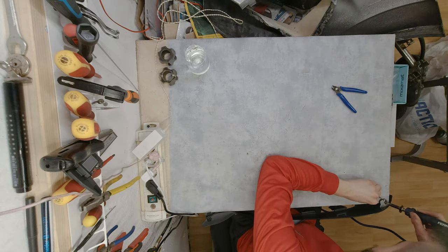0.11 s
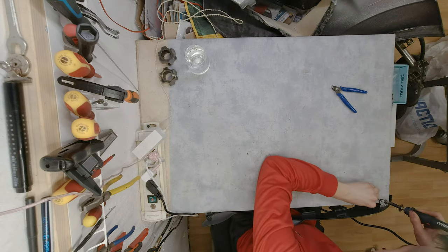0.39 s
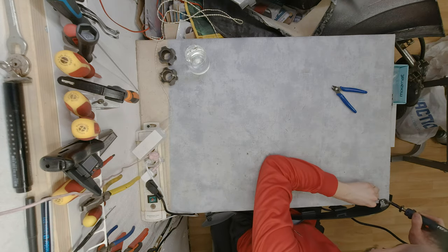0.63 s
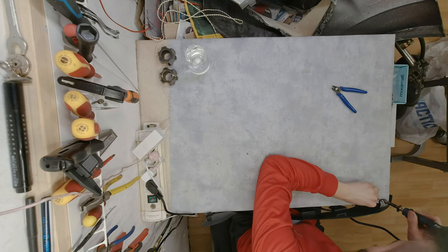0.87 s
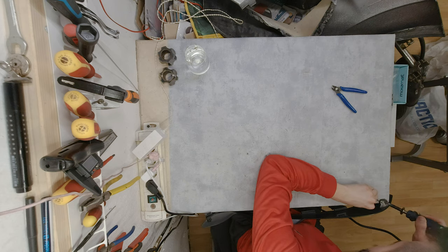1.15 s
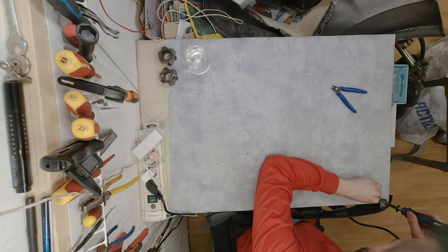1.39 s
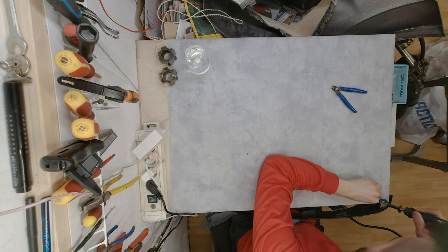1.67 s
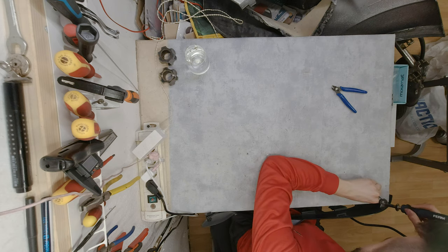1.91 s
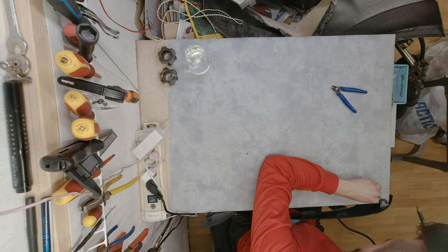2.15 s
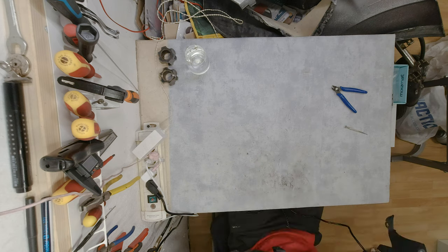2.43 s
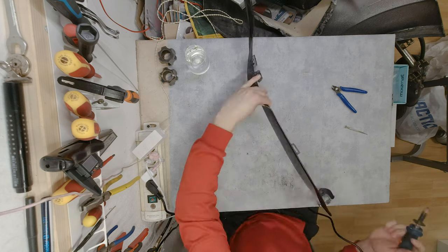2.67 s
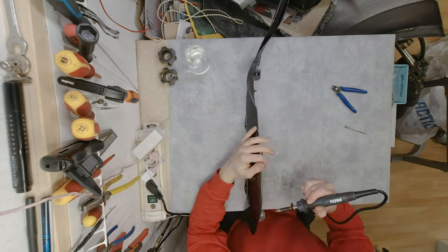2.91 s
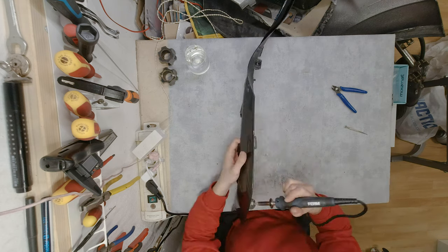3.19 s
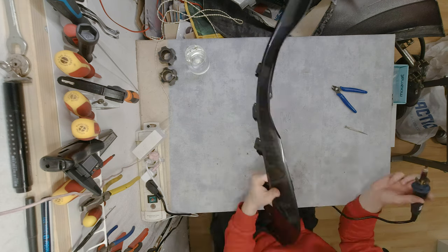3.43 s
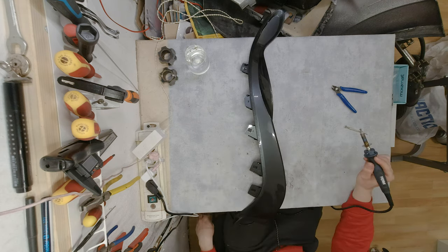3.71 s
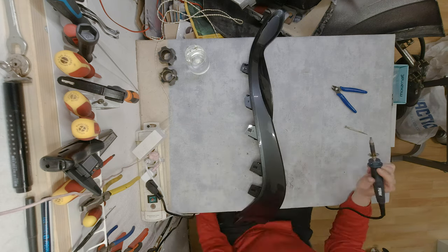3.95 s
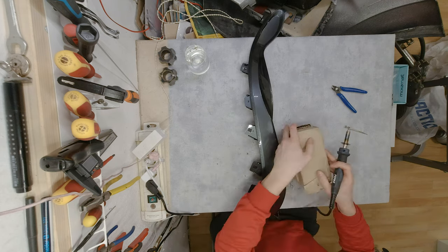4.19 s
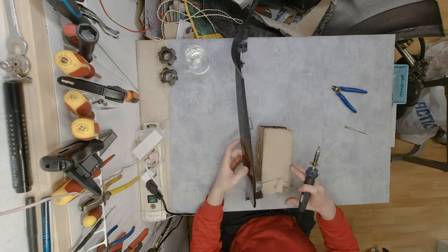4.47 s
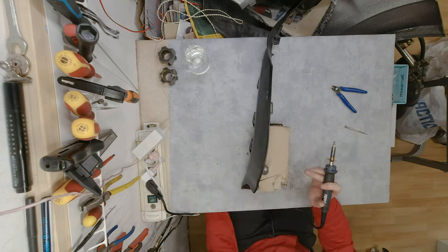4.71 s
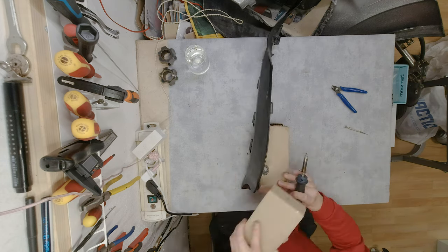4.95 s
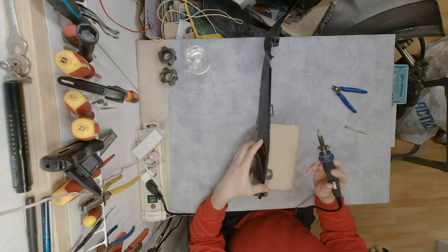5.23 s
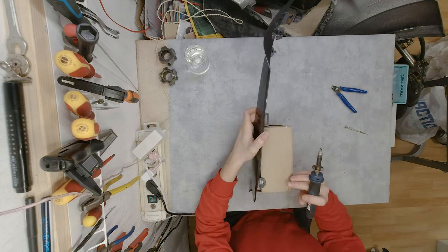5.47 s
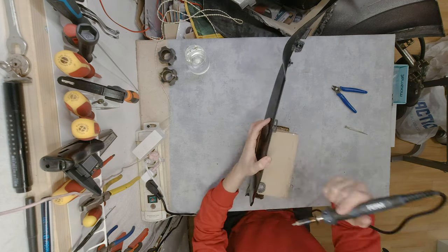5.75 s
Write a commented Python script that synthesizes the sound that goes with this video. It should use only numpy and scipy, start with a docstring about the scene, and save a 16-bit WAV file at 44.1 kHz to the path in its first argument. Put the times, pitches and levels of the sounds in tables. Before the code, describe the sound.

Quiet dull taps and faint grazes at a workbench, then a busy run of soft plastic knocks, scuffs and clicks ending in a firm thump.

```python
"""A long plastic trim piece, cardboard blocks and a hand tool are handled on a padded workbench.
Over quiet room tone, hand rustle and bench rumble (filtered noise), a tool tip grazes the trim (short noise
strokes), pokes it (choked bench modes) and a few clips click (detuned decaying sines). Just before 2 s the first
heavier knock rings the bench; from 2.3 s knocks and scuffs crowd in, with clicks between, and the rustle swells
several times before one last strong knock. The room is dry, heard by two spaced microphones."""
import sys
import numpy as np
from scipy import signal
from scipy.fft import rfft, irfft
from scipy.io import wavfile
from scipy.ndimage import uniform_filter1d

SR = 44100
rng = np.random.default_rng(int(sys.argv[2]) if len(sys.argv) > 2 else 0)


def volts_from_decibels(level):
    """Turn decibel levels (scalar or array-like) into linear amplitude factors."""
    exponent = np.asarray(level, float) / 20
    return 10 ** exponent


def digitize_waveform(pressure):
    """Quantize a signal to 16-bit integers and store it at the path in sys.argv[1].

    Rows of a 2-D input are taken as channels; values are limited to [-1, 1].
    """
    field = np.atleast_2d(pressure).T
    bounded = np.clip(field, -1, 1)
    quanta = np.round(bounded * 32767).astype(np.int16)
    wavfile.write(sys.argv[1], SR, quanta)


N = 258405

# Event levels are those ahead of the room.
# how busy the hands are: (time [s], rustle level [dB])
HAND_ACTIVITY = [(0.0, -73.5), (2.33, -77), (3.02, -64), (3.16, -76), (4.31, -69), (4.58, -61.5),
                 (4.72, -81.5), (4.91, -72), (5.29, -64), (5.55, -61), (5.86, -78)]
# colour of plastic scraping, before any tilt: (frequency [Hz], relative level per hertz [dB])
SCRAPE_COLOUR = [(500, 4.5), (1100, 1.5), (2500, 3.5), (3900, 3.5), (6500, -7), (10500, -12), (12800, -19),
                 (16000, -15.5)]
# colour of the steady room tone: (frequency [Hz], relative level per hertz [dB])
ROOM_TONE_COLOUR = [(30, 4.5), (200, 8.5), (450, -17), (1000, -7.5), (3500, -18.5), (9000, -38.5)]
# the tool tip grazes the trim: (time of fullest level [s], hiss rms there [dB])
TOOL_GRAZES = [(0.1235, -51), (0.5542, -53.5), (0.7223, -53), (1.2678, -54), (1.286, -60), (1.6445, -52.5),
               (1.8124, -57), (2.2654, -48.5), (3.249, -56)]
# the tool tip pokes the trim held against the bench edge: (time [s], mean peak of both sides [dB])
TOOL_POKES = [(0.1399, -32.5), (0.399, -34), (0.5759, -30.5), (0.799, -42.5), (0.92, -35.5), (0.965, -37.5),
              (1.0998, -31.5), (1.323, -31), (2.077, -35), (2.094, -37)]
# modes of bench and parts: (centre frequency [Hz], decay time t60 before the choke [s])
BENCH_MODES = [(80, 0.5), (140, 0.082), (212, 0.052), (315, 0.03), (510, 0.021), (730, 0.019),
               (1010, 0.028), (1400, 0.003)]
# clips and corners of the trim click: (time [s], peak [dB], pitch centre [Hz])
CLIP_CLICKS = [(0.4596, -60, 4940), (0.4942, -55, 1750), (2.956, -43.5, 2110), (3.6145, -44.5, 1930),
               (4.656, -35, 5020), (5.238, -42, 1863), (5.4327, -30, 3850), (5.4578, -34.5, 1145),
               (5.4873, -34.5, 2013)]
# trim and blocks knock on the bench: (time [s], mean peak of both sides [dB], pitch centre [Hz])
BENCH_KNOCKS = [(1.838, -29.5, 274), (2.3714, -40.5, 330), (2.4949, -26.5, 292), (2.6023, -29, 300),
                (2.633, -31, 205), (2.656, -31, 201), (2.6851, -28.5, 234), (2.7905, -26, 254),
                (2.8091, -23.5, 180), (2.852, -24.5, 150.8), (2.865, -22.5, 430), (2.9416, -38, 383),
                (3.126, -40.5, 128.3), (3.578, -26.5, 537), (3.615, -23, 188), (3.635, -33.5, 115.4),
                (3.655, -33, 615), (3.6588, -28, 145), (3.688, -35, 377), (3.978, -39.5, 305.4),
                (4.0386, -38.5, 157), (4.1141, -40, 344), (4.2561, -25.5, 596), (4.263, -24.5, 476),
                (4.276, -30.5, 231), (4.379, -47.5, 246), (4.4078, -34, 262.6), (4.4634, -31, 410.6),
                (4.478, -40.5, 490), (4.519, -41.5, 226.4), (4.549, -43, 258), (4.59, -29, 377),
                (4.649, -26, 422.7), (4.6646, -24.5, 354), (4.724, -42.5, 137.5), (4.7533, -33, 730),
                (4.8971, -32.5, 230), (4.9478, -34.5, 290.7), (5.1633, -25.5, 300), (5.177, -40, 600),
                (5.193, -35, 692), (5.221, -36, 285.4), (5.2586, -35.5, 180), (5.302, -41, 180),
                (5.357, -46, 400), (5.387, -30.5, 163.8), (5.4386, -34.5, 222), (5.4544, -27.5, 138.9),
                (5.503, -27.5, 161), (5.596, -35, 100.9), (5.749, -19, 195)]
# edges scuff the mat and each other:
# (time of fullest level [s], hiss rms there [dB], length scale [ms], brightness, -18 is neutral [dB])
EDGE_SCUFFS = [(2.3467, -59.5, 27, -25.5), (2.4573, -42, 7.8, -13), (2.4936, -39, 12.1, -20),
               (2.5328, -45, 8.8, -19), (2.6035, -38, 6.8, -23), (2.624, -44.5, 8.1, -21.5),
               (2.658, -47, 18.6, -23), (2.686, -45, 8.9, -21), (2.7004, -40, 6.3, -20.5),
               (2.848, -46.5, 15.5, -15), (3.018, -66.5, 15.2, -14.5), (3.1384, -57, 30.3, -24),
               (3.375, -63.5, 45, -18.5), (3.793, -44.5, 6.83, -10), (3.953, -44, 10.5, -10),
               (4.041, -55.5, 29.2, -19), (4.1707, -44.5, 8.8, -16), (4.19, -56, 12, -11.5),
               (4.262, -53.5, 19.5, -4), (4.3083, -54, 32.5, -12), (4.3821, -52, 11.6, -9),
               (4.4123, -47, 28, -13), (4.4655, -50, 10.7, -15.5), (4.525, -51.5, 23.5, -18),
               (4.568, -46.5, 4.95, -20), (4.6596, -34.5, 17.3, -16.5), (4.699, -58.5, 82, -19),
               (4.945, -52, 21.7, -23), (5, -58, 10.4, -11), (5.044, -53, 15.7, -9),
               (5.0615, -43, 9.4, -11), (5.096, -54.5, 33.6, -12.5), (5.163, -39.5, 12.8, -17.5),
               (5.2578, -43.5, 11.4, -16.5), (5.2916, -46.5, 10, -14), (5.35, -54, 12.2, -12),
               (5.387, -50.5, 9.7, -22), (5.405, -40.5, 6, -16.5), (5.5009, -39, 11.1, -17),
               (5.5521, -44.5, 10.6, -22), (5.5736, -49.5, 11.1, -19), (5.61, -53.5, 33.7, -27),
               (5.693, -49, 33, -16), (5.7274, -47, 27.4, -22.5), (5.7499, -39.5, 13.1, -20.5),
               (5.7951, -47, 8.1, -17.5), (5.815, -54.5, 21.8, -23.5)]

ROOM_TONE_DB = -72.5
CALM_DB, RUMBLE_DB, RUMBLE_FOLLOW = -72.5, -86.5, 0.72  # rumble at calm; dB of rumble per dB of rustle
LEAN_DB, LEAN_FADE_DB_PER_S = -66.5, 2.5  # rumble of the forearm leaning on the bench, easing off
LEAD_S = 0.03  # from the start of a scuff to its fullest level
GRAZE_MS, GRAZE_BRIGHT_DB = 7.1, -27.5
CATCH_DB = 2  # peak of a catching corner's notes over the scuff's hiss rms
POKE_HZ, POKE_SPREAD, KNOCK_SPREAD = 230, 0.5, 0.99  # pitch centre; spreads in octaves
# edge tick: delay, level under its knock, rise of that level per octave of spread, length scale, brightness
EDGE_LAG_S, EDGE_DB, EDGE_DB_PER_OCTAVE, EDGE_MS, EDGE_BRIGHT_DB = 0.001501, -24, 6.5, 4.5, -35.5
CLICK_DETUNE, CLICK_T60_S, CLICK_RISE_S = 0.074, 0.026, 0.0014  # detune is a fraction of the pitch
CLICK_EDGE_DB = -11  # edge tick against its click


def read(points, hz):
    """Reads a spectrum on a log-frequency axis."""
    point_hz, value = np.transpose(points)
    return np.interp(np.log(hz + 1), np.log(point_hz + 1), value)


def add(mix, s, sound):
    """Lays a two-channel sound into the mix at a time in seconds."""
    part = mix[:, max(round(s * SR), 0):][:, :sound.shape[1]]
    part += sound[:, :part.shape[1]]


def coloured(x, db):
    """Filters by a dB spectrum and brings the result to rms 1."""
    y = irfft(rfft(x) * volts_from_decibels(db), x.shape[-1])
    return y / np.sqrt(np.mean(y ** 2))


def flicker(span, depth_db):
    """Random level wander shared by both microphones; span is its smoothing in samples."""
    wander = uniform_filter1d(uniform_filter1d(rng.standard_normal(N), span), span)
    return volts_from_decibels(depth_db * wander / wander.std())


def rattle(per_s, t60):
    """Loose clips and corners touch at random; each contact rings one short plastic note, stronger on one side."""
    t = np.arange(512) / SR
    out = np.zeros((2, N))
    for k, hz in enumerate(np.geomspace(450, 5200, 12)):
        force_db = 2.5 * rng.exponential(1, N).clip(0, 3)
        touches = (rng.random(N) < per_s / SR) * volts_from_decibels(force_db)
        ring = np.sin(2 * np.pi * hz * t) * volts_from_decibels(-60 * t / t60)
        near = signal.oaconvolve(touches, ring)[:N]
        far = 0.5 * np.roll(near, 20)  # 20 samples later
        out += [near, far] if k % 2 == 0 else [far, near]
    return out / out.std()


def rustle(busy_db, hz):
    """Skin and cloth brush plastic: flickering scrape noise and small rattles follow how busy the hands are."""
    tilt_db = -4.5 * np.log2(1 + hz / 3000)
    hiss = coloured(rng.standard_normal((2, N)), read(SCRAPE_COLOUR, hz) + tilt_db)
    hiss *= flicker(span=400, depth_db=2.5)
    return (hiss + volts_from_decibels(-5) * rattle(per_s=12, t60=0.012)) * volts_from_decibels(busy_db)


def rumble(busy_db, hz, t):
    """Hand and forearm movement travels through the bench as flickering low noise."""
    band_db = -10 * np.log10((hz / 260) ** 4 + 1 + (75 / (hz + 1)) ** 4)  # about 75 to 260 Hz
    low = coloured(rng.standard_normal((2, N)), band_db) * flicker(span=350, depth_db=2.5)
    hands = volts_from_decibels(RUMBLE_DB + RUMBLE_FOLLOW * (busy_db - CALM_DB))
    lean = volts_from_decibels(LEAN_DB - LEAN_FADE_DB_PER_S * t)
    return low * (hands + lean)


def room_tone(hz):
    """Steady filtered noise, independent at the two microphones."""
    return coloured(rng.standard_normal((2, N)), read(ROOM_TONE_COLOUR, hz)) * volts_from_decibels(ROOM_TONE_DB)


def handling():
    """Hand rustle and bench rumble share one activity curve, with room tone beneath."""
    t, hz = np.arange(N) / SR, np.fft.rfftfreq(N, 1 / SR)
    busy_db = np.interp(t, *np.transpose(HAND_ACTIVITY))
    return rustle(busy_db, hz) + rumble(busy_db, hz, t) + room_tone(hz)


def scuff(level_db, length_ms, bright_db):
    """Packed micro-slips swell twice as fast as they die; a brighter tilt makes a harder edge."""
    t, hz = np.arange(4096) / SR - LEAD_S, np.fft.rfftfreq(4096, 1 / SR)
    grain_db = 15.0 * uniform_filter1d(rng.standard_normal(len(t)), 30)
    slips = rng.standard_normal((2, len(t))) * volts_from_decibels(grain_db)
    ripple_depth_db = 12.0 + 45 / length_ms  # short ticks ring with most colour
    ripple_db = ripple_depth_db * uniform_filter1d(rng.standard_normal(len(hz)), 60)
    tilt_db = (bright_db + 18.0) * np.clip(np.log2(hz / 2600 + 1e-9) / 1.5, -0.6, 1.2)
    stroke = coloured(slips, read(SCRAPE_COLOUR, hz) + tilt_db + ripple_db)
    # corners catch along the stroke
    for place, pitch in rng.random((round(length_ms / 3), 2)):
        catch_s = LEAD_S + (1.5 * place - 0.5) * length_ms / 1000
        add(stroke, catch_s, click(CATCH_DB, 600 * 7 ** pitch))
    u = t * 1000 / length_ms
    shape = np.exp(-abs(u / np.where(t < 0, 0.4, 0.8)) ** 1.84)
    shape += volts_from_decibels(-27.0) * np.exp(-(t / 0.0087) ** 2) * (t > 0)  # the part drags softly afterwards
    return stroke * shape * volts_from_decibels(level_db)


def knock(peak_db, centre_hz, spread):
    """A soft push rings the modes near its pitch centre; each microphone hears them in its own phase."""
    t = np.arange(4096) / SR
    hz, t60 = np.transpose(BENCH_MODES)[:, :, None]
    shift, phase, apart = rng.standard_normal((len(BENCH_MODES), 3)).T[:, :, None]
    reach_db = -4.5 * (np.log2(hz / centre_hz) / spread) ** 2  # bell around the centre
    rise = 1 - np.exp(-(t * hz / 0.35) ** 2)  # the push lasts most of a cycle
    choke = np.exp(-(t / 0.016) ** 2)  # hand and pad stop the ring
    ring = volts_from_decibels(reach_db - 60 * t / t60) * rise * choke
    turn = 2 * np.pi * hz * (1 + 0.088 * shift) * t + 0.63 * phase
    pair = np.array([(ring * np.sin(turn + side * 0.72 * apart)).sum(0) for side in (1, -1)])
    pair /= abs(signal.hilbert(pair)).max(1)[:, None]
    balance_db = 0.5 + 1.84 * rng.standard_normal()  # a little left on average
    return pair * volts_from_decibels(peak_db + balance_db * np.array([[1], [-1]]))


def click(peak_db, hz):
    """A clip or corner flicks: three close plastic notes die quickly."""
    t = np.arange(2048) / SR
    shift, apart = rng.standard_normal((2, 3, 1))
    turn = 2 * np.pi * hz * (1 + CLICK_DETUNE * shift) * t
    pair = np.array([np.sin(turn + side * apart / 2).sum(0) for side in (1, -1)])
    pair *= volts_from_decibels(-60 * t / CLICK_T60_S) * np.minimum(t / CLICK_RISE_S, 1)
    return pair / abs(pair).max(1, keepdims=True) * volts_from_decibels(peak_db)


def room(x, t60, wet_db, top_hz):
    """A short, dull scatter of sparse random reflections off the bench clutter."""
    t = np.arange(4000) / SR
    sparse = rng.standard_normal((2, len(t))) * (rng.random((2, len(t))) < 0.05)
    tail = sparse * volts_from_decibels(-60 * t / t60) * (t > 0.002)
    tail /= np.linalg.norm(tail, axis=1, keepdims=True)
    tail = signal.lfilter(*signal.butter(2, [250, top_hz], "band", fs=SR), tail)
    return x + volts_from_decibels(wet_db) * signal.oaconvolve(x, tail, axes=1)[:, :N]


def scene():
    """Hits in their room over the handling noise; knocks and clicks each bring a dull tick of the edge."""
    hits = np.zeros((2, N))
    for s, level_db in TOOL_GRAZES:
        add(hits, s - LEAD_S, scuff(level_db, GRAZE_MS, GRAZE_BRIGHT_DB))
    blows = [(*row, POKE_HZ, POKE_SPREAD) for row in TOOL_POKES]
    blows += [(*row, KNOCK_SPREAD) for row in BENCH_KNOCKS]
    for s, peak_db, centre_hz, spread in blows:
        add(hits, s, knock(peak_db, centre_hz, spread))
        edge_db = peak_db + EDGE_DB + EDGE_DB_PER_OCTAVE * spread
        add(hits, s + EDGE_LAG_S - LEAD_S, scuff(edge_db, EDGE_MS, EDGE_BRIGHT_DB))
    for s, peak_db, hz in CLIP_CLICKS:
        add(hits, s, click(peak_db, hz))
        add(hits, s + EDGE_LAG_S - LEAD_S, scuff(peak_db + CLICK_EDGE_DB, GRAZE_MS, GRAZE_BRIGHT_DB))
    for s, level_db, length_ms, bright_db in EDGE_SCUFFS:
        add(hits, s - LEAD_S, scuff(level_db, length_ms, bright_db))
    return room(hits, t60=0.07, wet_db=-10, top_hz=5500) + handling()


def mute_quiet_treble(x, from_hz, gate_db, slope_db):
    """Silences treble bands that fall under a threshold rising by slope_db per octave."""
    hz, _, z = signal.stft(x, SR, nperseg=512, noverlap=384)
    power = uniform_filter1d(abs(z) ** 2, 12, axis=1)  # smoothed over frequency
    power = uniform_filter1d(power, 3, axis=2)  # then over time
    band_db = 10 * np.log10(power)
    limit_db = (gate_db + slope_db * np.log2(hz / from_hz + 1e-9))[:, None]
    keep = np.clip((band_db - limit_db) / 3, 0, 1)  # opens fully 3 dB above the limit
    keep[:, hz < from_hz] = 1
    return signal.istft(z * keep, SR, nperseg=512, noverlap=384)[1][:, :N]


def roll_off(x):
    """The treble ends steeply here."""
    return signal.sosfilt(signal.butter(12, 16410, fs=SR, output="sos"), x)


def record(dry):
    """The recorder gates faint treble and delivers the finished mix."""
    mix = mute_quiet_treble(dry, from_hz=8360, gate_db=-103, slope_db=32.5)
    return roll_off(mix)


dry = scene()
out = record(dry)
digitize_waveform(out)
```